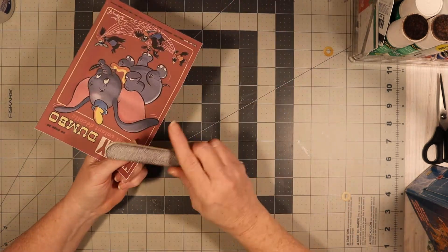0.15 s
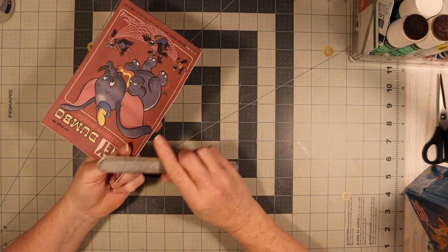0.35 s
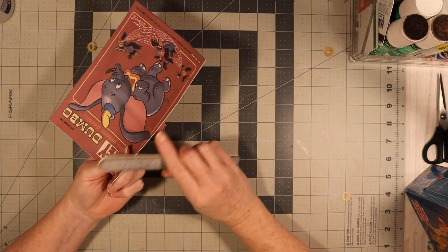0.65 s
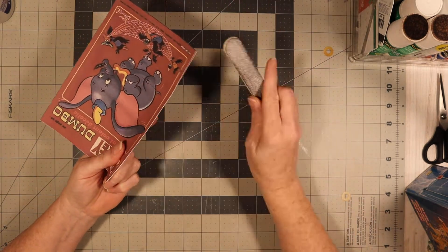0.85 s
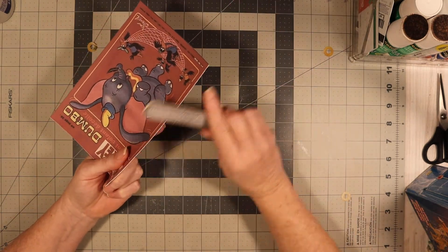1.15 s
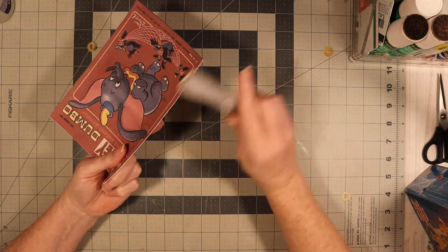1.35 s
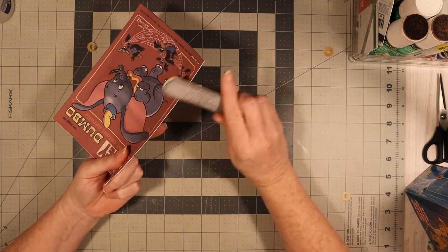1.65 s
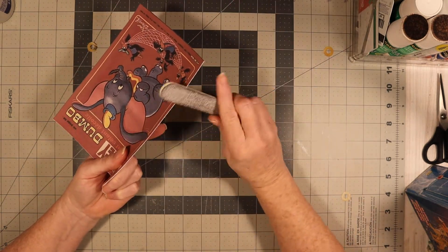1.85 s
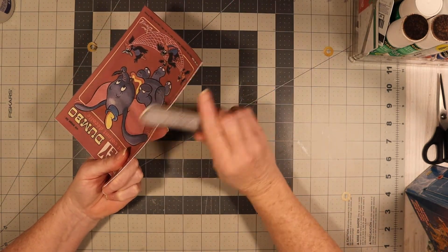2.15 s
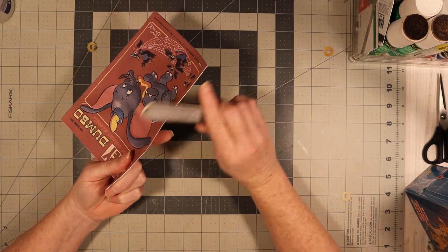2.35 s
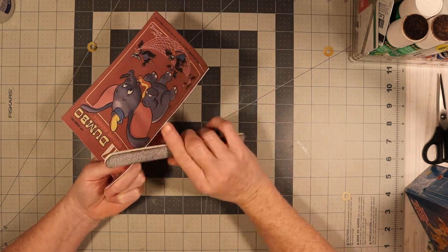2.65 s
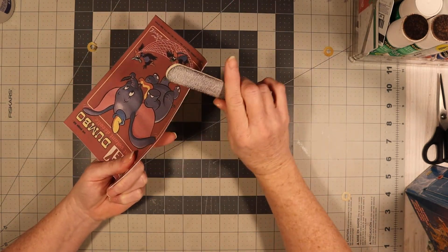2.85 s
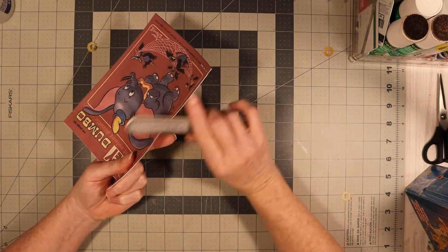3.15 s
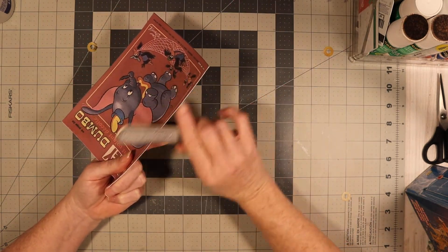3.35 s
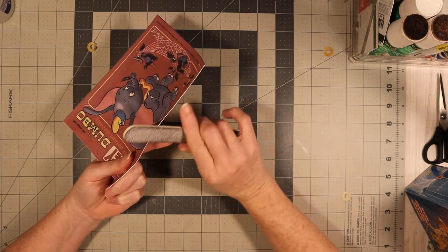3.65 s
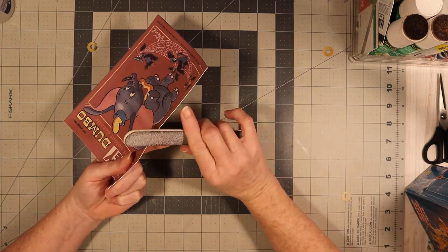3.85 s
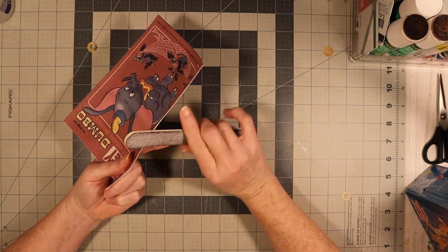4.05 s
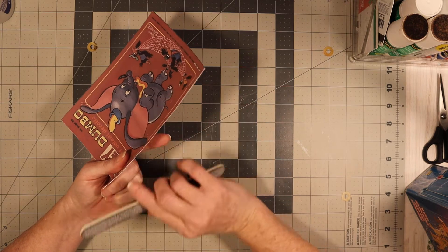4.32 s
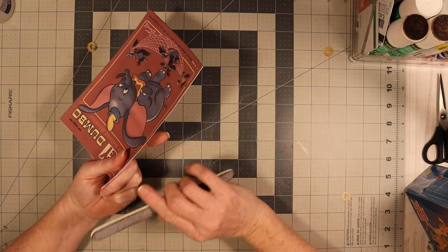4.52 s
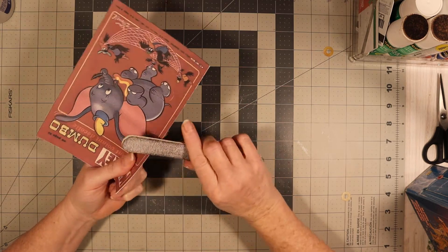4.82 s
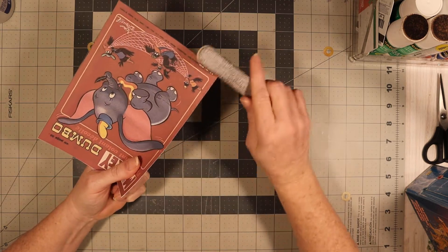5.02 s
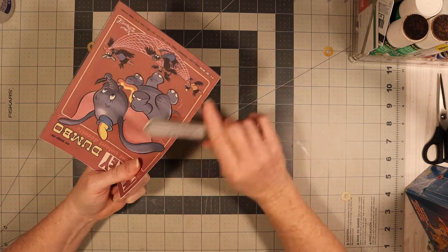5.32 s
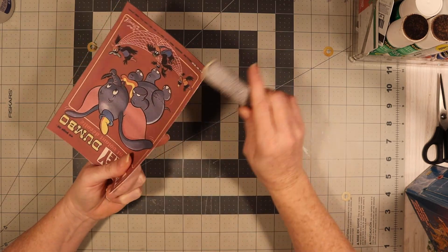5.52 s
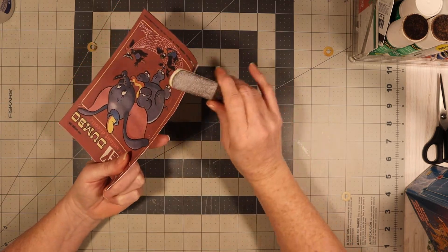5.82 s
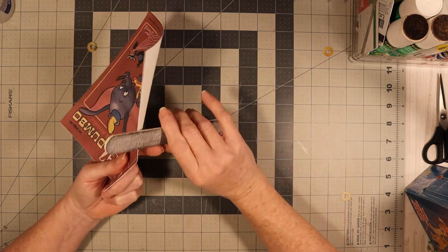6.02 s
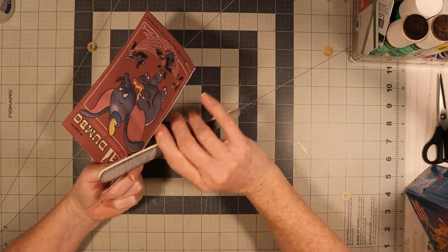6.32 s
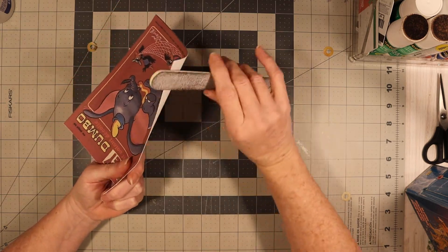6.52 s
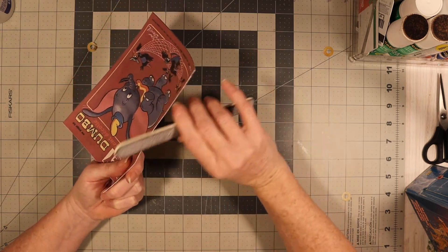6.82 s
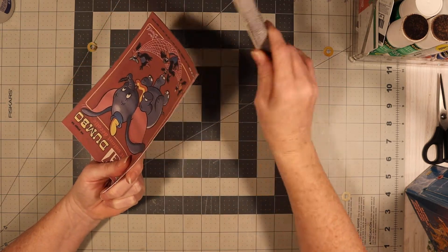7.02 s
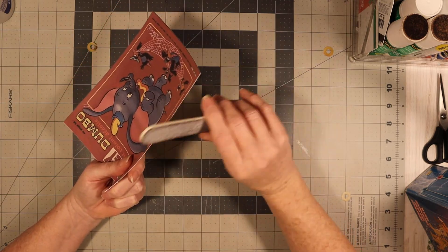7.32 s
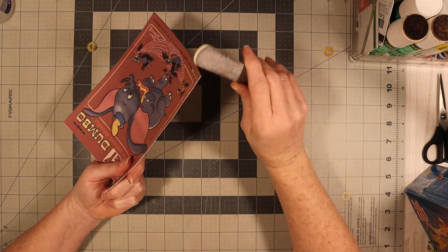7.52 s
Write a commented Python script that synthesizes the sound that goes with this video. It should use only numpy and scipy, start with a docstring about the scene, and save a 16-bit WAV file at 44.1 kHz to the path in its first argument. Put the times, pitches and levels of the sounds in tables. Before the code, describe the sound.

Close, dry rasping of fine grit on paper edges: hesitant at first, then a steady run of rapid alternating strokes with a hollow, papery ring. After a gap come hard flicks off the cover's corner, softer scrapes and a final stroke. Pages shift faintly in the hand. Quiet small room, wide stereo from above the table.

```python
"""A tap opens the scene; then a dense rasp runs to and fro, broken by sharp flicks, over faint room tone.
A nail file is rubbed along the cut edge of a card-covered stack of pages held over a table.
Random grains excite the card's modes and a coloured hiss; short damped sines are the file landing on
the card or flicking off its corner, and low lumpy noise is the pages shifting in the hand.
A wide stereo microphone hangs above, in a small quiet room."""
import sys
import numpy as np
from scipy import signal
from scipy.fft import rfft, irfft, next_fast_len
from scipy.io import wavfile
from scipy.ndimage import uniform_filter1d

SR = 44100
rng = np.random.default_rng(int(sys.argv[2]) if len(sys.argv) > 2 else 0)


def to_wav(sig):
    """Store sig (one row per channel, or 1-D mono) as 16-bit WAV at the path in sys.argv[1].

    Samples outside -1..1 are clipped; the rate is SR.
    """
    pcm = np.clip(np.atleast_2d(sig), -1, 1) * 32767
    pcm = np.round(pcm).astype(np.int16)
    wavfile.write(sys.argv[1], SR, pcm.T)  # frames by channels


N = 338247

# Strokes of the file. Each row: start in seconds, length in seconds, relative rasp level in dB early,
# midway and late, change of the low part in dB early and late, change of the treble in dB early and late.
STROKES = [ (.006, 0.081, -44, -59, -50, 8, 14, 8, 9.5),
           (0.042, 0.26, -43.5, -51, -59.5, 10, -1.5, 13, 8.5),
           (.372, 0.21, -54, -26, -26.5, 1.5, 1.5, 10.5, -2),
           (0.573, 0.14, -31, -30.5, -32.5, 10.5, 1.5, 2, 4.5),
           (0.705, 0.14, -26.5, -21, -22.5, -20, 1.5, 1.5, 3.5),
           (.815, 0.092, -23, -19, -22.5, 9.5, 11.5, 1, 2), (1.148, 0.2, -27.5, -24.5, -29, -3, 12.5, 0, 8),
           (1.565, 0.16, -27.5, -23, -29.5, 2.5, 2, 2.5, 2),
           (1.711, 0.15, -32, -26.5, -24.5, 8, -1, -4.5, -2),
           (1.857, 0.11, -27.5, -27.5, -33, -3, 12, -5, 3),
           (1.961, 0.13, -26.5, -28, -23.5, 3, -0.5, 1.5, -6),
           (2.094, 0.11, -25, -29.5, -30.5, 3, 13.5, -0.5, 3),
           (2.196, .15, -28, -24, -24.5, -1, -4, 4.5, -1.5),
           (2.351, 0.18, -23, -23, -30.5, -5, 5.5, 4.5, 2),
           (2.55, 0.18, -22.5, -18.5, -22.5, 4.5, -8, -4.5, -0.5),
           (2.718, .23, -34, -20.5, -23.5, -26, 7, -0.5, 0),
           (2.952, 0.21, -24, -23.5, -27.5, -1, -7, -3.5, 3.5), (3.153, .19, -28, -22, -23, 0, -3, 4, -4.5),
           (3.345, 0.18, -22.5, -24.5, -22, -10, -4, -6, -1),
           (3.524, .145, -25, -24, -25.5, -13, 4, 3.5, 4), (3.668, .1, -21.5, -20.5, -23, -6, 7.5, -6, -5),
           (3.763, 0.098, -29.5, -26, -28.5, -4.5, 1, 3.5, 1),
           (3.853, 0.11, -26, -21, -24.5, -2.5, 3, -3.5, -4.5),
           (3.955, 0.094, -29, -25, -26.5, -3, -12, 1.5, 1),
           (4.045, .105, -21.5, -20.5, -24, 0, 0, -5.5, -1),
           (4.146, 0.095, -26, -27, -31.5, -10, 4.5, 1, 2), (4.234, 0.14, -22, -20, -29, -4, 4, 3.5, 4),
           (4.918, .226, -25, -25, -44, 4.5, 4, 1.5, 12), (5.35, 0.022, -37, -37, -34.5, 3, 0, 2, 2),
           (5.378, 0.13, -24, -30, -35, -1, 12, 7, 14.5), (5.718, .13, -37.5, -42.5, -41, 8, 11, -8, -1),
           (5.855, 0.29, -49, -28, -26.5, 11.5, -10, 0, 0), (6.103, 0.11, -40, -42.5, -28.5, 6, 10, -5, -2),
           (6.239, 0.18, -38.5, -40.5, -44, 7, 9, -11, -6),
           (6.4, 0.25, -27, -25.5, -23.5, -4.5, 7.5, 3.5, 1),
           (6.666, 0.22, -30.5, -30.5, -31.5, -6, 0, 0.5, 0),
           (6.87, .1, -27, -22.5, -26.5, -12, 3, -5, 5.5),
           (6.948, 0.089, -25.5, -18.5, -24, -11, 10.5, 8, 0.5),
           (7.478, 0.12, -36.5, -22, -26, 13, 3.5, -2, 8), ]
# Landings and flicks of the file. Each row: time in seconds, relative slap level in dB, slap frequency
# in Hz, relative level of the knock into the card in dB, relative thud of the pages in dB.
TAPS = [(0, -18.5, 1020, -23.5, -28), (.051, -21, 1960, -21, -42), (0.054, -17.5, 2340, -32, -35),
        (.379, -33, 1090, -28, -53), (.9005, -5.5, 1580, -3, -31.5), (1.135, -27, 2060, -22.5, -48),
        (1.319, -15, 1840, -6, -31), (1.551, -16, 2450, -3.5, -25), (1.559, -19, 2000, -6.5, -59),
        (4.8752, -24.5, 2220, -9, -23.5), (5.1398, -14.5, 2070, -3, -40), (5.354, -28.5, 2450, -14, -28),
        (5.3708, -3.5, 2140, 1, -33), (5.375, -12.5, 1980, -15, -19.5), (5.5058, 2, 2075, -7.5, -18),
        (7.042, -4.5, 2660, -6.5, -27), (7.051, -12.5, 1510, -8, -55), (7.478, -26.5, 1410, -17.5, -25)]
# Modes of the card and pages. Each row: frequency in Hz, undamped-by-touch width in Hz, relative level in dB.
CARD_MODES = [(157.4, 210, -33.5), (293, 22.6, -9), (692.3, 62, 0), (824, 96, -4), (1114, 63.4, 4.5),
              (1369, 69, -1.5), (1600, 57, 4), (1820, 48, 2), (1993, 65, -2.5), (2360, 150, 1),
              (2566, 53, 2), (3057, 32, -1), (3510, 116, -3.5), (3930, 150, -3), (4400, 57, -6.5),
              (4830, 160, -8), (5380, 280, -10), (6030, 230, -12.5), (7140, 92, -21.5)]
# Spectrum of the hiss of the grit itself. Each row: frequency in Hz, relative density in dB.
GRIT_SPECTRUM = [(240, -60), (400, -23), (683, -7.5), (1610, -6.5), (1960, -8.5), (2470, -1), (3300, -10.5),
                 (10900, -20.5), (15400, -43)]
# Movements of the pages in the hand. Each row: start in seconds, length in seconds,
# relative rustle level in dB early and late.
PAGE_SHIFTS = [(.07, 0.084, -40, -50), (4.887, 0.28, -55, -44), (5.36, .15, -40, -50),
               (7.015, 0.094, -42.5, -45.5), (7.478, .07, -41, -45)]
# Gain of the microphone's side signal. Each row: frequency in Hz, gain in dB.
SIDE_GAIN = [(60, -28), (150, -12), (380, -26), (950, -11.5), (2380, 2.5), (5980, 4.5), (15000, 10)]
# Spectrum of the room tone. Each row: frequency in Hz, relative density in dB.
AIR_SPECTRUM = [(12, -56.5), (20, -16.5), (80, -1.5), (180, -6), (273, -7.5), (427, -10.5), (564, -11.5),
                (9360, -37), (13100, -43), (15400, -82)]
# Side level of the room tone over its mid level. Each row: frequency in Hz, ratio in dB.
AIR_WIDTH = [(60, -18.5), (180, 0), (550, 4.5), (1650, 6.5), (4970, 6.5), (15000, 3.5)]

AIR_DB = -54  # rms of the mid room tone, before its swell
EDGE_HZ = 15600  # upper band limit
TURN_DB = -30  # how far a movement sinks where the hand turns round
FLICK_S, NEAR_S = 0.003, 0.016  # a movement that starts or ends within NEAR_S of a tap ramps in FLICK_S
ATTACK_S, RELEASE_SHARE = 0.022, 0.25  # otherwise: rise in seconds, fall as a share of the length
BEND = 1.32  # power law of both ramps


def rasp():
    """Stick-slip friction: uneven grains catch the edge in clumps, exciting the card's modes and a hiss."""
    level = sweeps(np.array(STROKES)[:, :5])
    level = uniform_filter1d(level, size=300)  # the hand rounds off each stroke
    flex_db = tint(*np.transpose(STROKES)[5:7])
    bite_db = tint(*np.transpose(STROKES)[7:])

    size_db = 1.45 * np.minimum(rng.exponential(1, N), 5) + 0.76 * wander(90)
    catches = rng.random(N) < 9000 / SR  # 9000 a second on average
    grains = evened(gain_of(size_db) * catches) * rng.choice([-1., 1.], (3, N))

    ring_scale = np.std(card(grains[0], 0, 0, 0, 0.99)[0])
    ring = card(grains[0] * level, flex_db, bite_db, patchy_db=3.0, damping=1) / ring_scale

    hiss = colour(np.array([grains[1], 0.1 * grains[1] + grains[2]]), GRIT_SPECTRUM)
    hiss = patchy(hiss, depth_db=3.5)
    hiss /= np.std(hiss[0])
    treble = signal.sosfilt(signal.butter(2, 3500, "high", fs=SR, output="sos"), hiss)
    body = signal.sosfilt(signal.butter(2, 900, fs=SR, output="sos"), hiss)
    hiss += treble * (gain_of(bite_db) - 1) + body * (gain_of(flex_db) - 1)
    return gain_of(-3.0) * ring + gain_of(-2.0) * hiss * level


def sweeps(rows):
    """Friction noise follows speed: each movement rises from the turn, holds its levels and sinks again."""
    out = np.zeros(N)
    hits = np.array([row[0] for row in TAPS])
    for start, length, *levels_db in rows:
        t = np.arange(0, length, 1 / SR)
        starts_at_tap = np.any(abs(hits - start) < NEAR_S)
        ends_at_tap = np.any(abs(hits - start - length) < NEAR_S)
        rise = FLICK_S if starts_at_tap else ATTACK_S
        fall = FLICK_S if ends_at_tap else RELEASE_SHARE * length
        speed = np.clip(np.minimum(t / rise, (length - t) / fall), 0, 1)
        held_db = np.interp(t, np.linspace(rise, length - fall, len(levels_db)), levels_db)
        out[round(start * SR):][:len(t)] += gain_of(held_db + TURN_DB * (1 - speed) ** BEND)
    return out


def tint(early_db, late_db):
    """Spectral balance varies along a stroke: it glides from an early colour to a late one."""
    start, length = np.transpose(STROKES)[:2]
    s = np.transpose([start + 0.26 * length, start + 0.75 * length]).ravel()
    return np.interp(np.arange(N) / SR, s, np.transpose([early_db, late_db]).ravel())


def patchy(x, depth_db):
    """Uneven surfaces: patches of colour a few hundred Hz wide drift as other grit meets other pages."""
    z = signal.stft(x, nperseg=512, noverlap=384)[2]
    patches = rng.standard_normal(z.shape[:0:-1])  # time by frequency
    patches = uniform_filter1d(patches, size=14, axis=0)
    patches = uniform_filter1d(patches, size=4, axis=1)
    z = z * gain_of(depth_db * evened(patches).T)
    return signal.istft(z, nperseg=512, noverlap=384)[1][:, :N]


def card(drive, flex_db, bite_db, patchy_db, damping):
    """Modal superposition: each mode swells and fades as the contact moves along its shape; mid, side."""
    out = np.zeros((2, N))
    for k, (hz, width, db) in enumerate(CARD_MODES):
        low = 1 / (1 + (hz / 950) ** 6)
        high = 1 / (1 + (4500 / hz) ** 6)
        shape_db = low * flex_db + high * bite_db + patchy_db * wander(22)
        sign = (-1) ** k  # neighbouring modes alternate in polarity
        ring = sign * resonate(drive * gain_of(db + shape_db), hz, width * damping)
        side = -0.8 * ring.imag + 0.15 * sign * ring.real  # mostly a quarter turn from the mid
        out += [ring.real, side]
    return out


def resonate(x, hz, width):
    """Damped resonance of gain 1 at its centre; the imaginary part lags the real one by a quarter turn."""
    r = np.exp(-np.pi * width / SR)
    return 2 * signal.lfilter([1 - r], [1, -r * np.exp(2j * np.pi * hz / SR)], x)


def taps():
    """Impact excitation: a slap and a soft knock ring the card, damped by the file; pages clatter and thud."""
    slaps, knocks, pages = np.zeros((3, N + 1500))
    t = np.arange(1500) / SR
    band = signal.butter(3, [400, 3300], "band", fs=SR, output="sos")
    roughs = signal.sosfilt(band, rng.standard_normal((len(TAPS), 1500)))
    for (s, slap_db, hz, knock_db, thud_db), rough in zip(TAPS, roughs):
        at = slice(round(s * SR), round(s * SR) + 1500)
        slap, knock = gain_of(slap_db), gain_of(knock_db)
        slaps[at] += slap * np.sin(2 * np.pi * hz * t) * t / 0.00076 * np.exp(1 - t / 0.00049)
        knocks[at] -= knock * np.sin(2 * np.pi * 720 * t) * t / 0.0016 * np.exp(1 - t / 0.00068)
        pages[at] += (0.67 * slap + 0.085 * knock) * rough * np.exp(-t / 0.0061)  # clatter
        pages[at] -= gain_of(thud_db) * np.sin(2 * np.pi * 170 * t) * np.exp(-t / 0.0016)  # thud
    slaps, knocks, pages = slaps[:N], knocks[:N], pages[:N]
    drive = gain_of(4.5) * slaps + gain_of(8.5) * knocks
    ring = card(drive, 0, 0, patchy_db=1, damping=2.2)
    return ring + gain_of(-10.0) * slaps + gain_of(-10) * knocks + pages


def rustle():
    """Sliding friction of pages on each other: low, lumpy band noise."""
    noise = rng.standard_normal(N) * gain_of(5.6 * wander(90))
    band = signal.butter(2, [100, 400], "band", fs=SR, output="sos")
    return evened(signal.sosfilt(band, noise)) * sweeps(PAGE_SHIFTS)


def room(x, t60=0.14):
    """Reverberation of table and walls: sparse echoes of random sign, the treble decaying sooner."""
    count = SR // 2
    echoes = rng.random((2, count)) < 2500 / SR
    delayed = np.arange(count) > 130  # samples before the first echo
    tail = rng.choice([-1., 1.], (2, count)) * echoes * delayed
    hz, t, z = signal.stft(tail, SR, nperseg=256)
    decay_s = t60 / (1 + (hz[:, None] / 6000) ** 2)  # time to fall 60 dB
    tail = signal.istft(z * gain_of(-60 * t / decay_s), SR, nperseg=256)[1]
    return signal.fftconvolve(x, tail / np.linalg.norm(tail[0]), axes=1)[:, :N]


def air():
    """Stationary noise, spectrally shaped, with a gentle swell: the room tone as mid and side."""
    mid, side = colour(rng.standard_normal((2, N)), AIR_SPECTRUM)
    level = gain_of(AIR_DB + 0.53 * wander(1.2))
    return level * np.array([mid, colour(side, AIR_WIDTH)]) / np.std(mid)


def gain_of(db):
    """The decibel law: a level in dB becomes an amplitude factor."""
    return 10 ** (np.asarray(db) / 20)


def evened(x):
    """Normalisation of effective value: scales to rms 1."""
    return x / np.sqrt(np.mean(x ** 2) + 1e-20)


def read(points, hz):
    """Interpolates a spectrum along a logarithmic frequency axis."""
    f, value = np.transpose(points)
    return np.interp(np.log(hz + 1), np.log(f + 1), value)


def colour(x, points):
    """Linear filtering in the frequency domain: shapes the last axis by a spectrum in dB."""
    size = next_fast_len(N + 4096)
    gain = gain_of(read(points, np.fft.rfftfreq(size, 1 / SR)))
    return irfft(rfft(x, size) * gain, size)[..., :N]


def wander(per_s):
    """Slow random fluctuation: straight lines between per_s normal draws a second."""
    knots = np.arange(-1, N / SR + 1, 1 / per_s)
    return np.interp(np.arange(N) / SR, knots, rng.standard_normal(4000)[:len(knots)])


def scene():
    """Superposition of sources, room and air as mid and side, then the sum and difference as left and right."""
    near = rasp() + taps() + rustle()
    # a small card sheds no deep bass
    near = signal.sosfilt(signal.butter(2, 95, "high", fs=SR, output="sos"), near)
    mid, side = near + gain_of(-17.5) * room(near)
    mid, side = np.array([mid, colour(side, SIDE_GAIN)]) + air()
    return np.array([mid + side, mid - side]) * gain_of([[0.4], [-0.4]])


def record(dry):
    """Amplitude limiting by clipping at full scale, then a linear-phase low-pass as the band limit."""
    capped = np.clip(dry, -1, 1)
    lowpass = signal.firwin(511, EDGE_HZ, window=("kaiser", 9), fs=SR)
    return signal.oaconvolve(capped, lowpass[None], "same")


dry = scene()
out = record(dry)
to_wav(out)
```